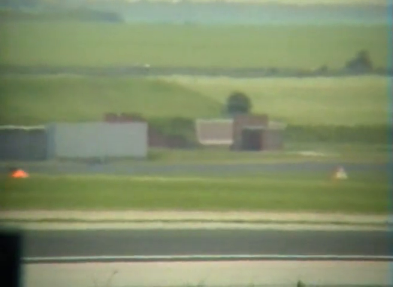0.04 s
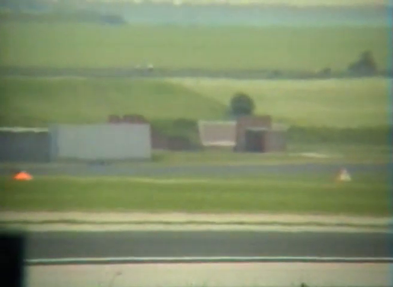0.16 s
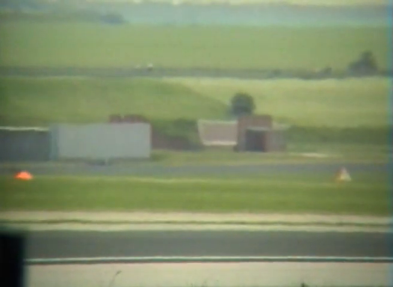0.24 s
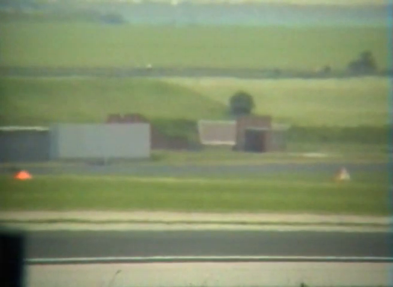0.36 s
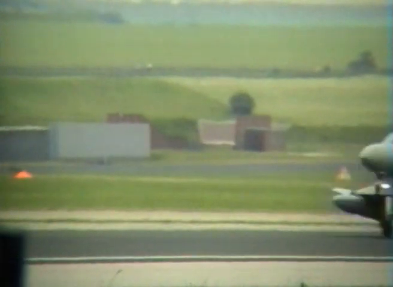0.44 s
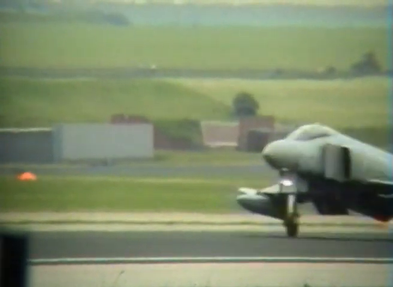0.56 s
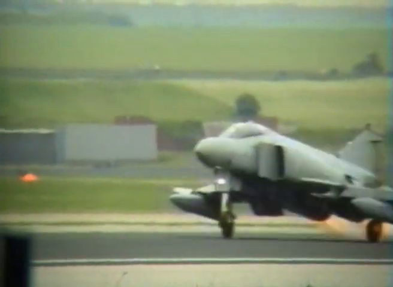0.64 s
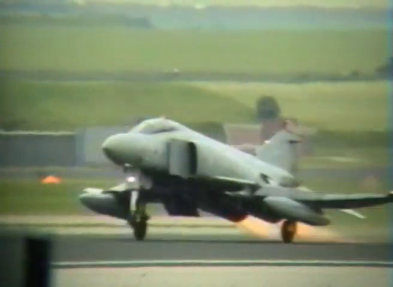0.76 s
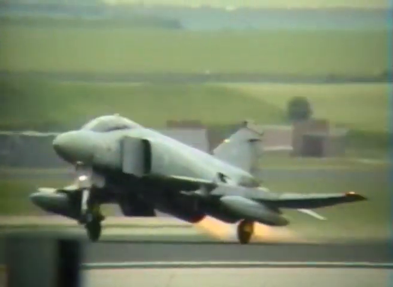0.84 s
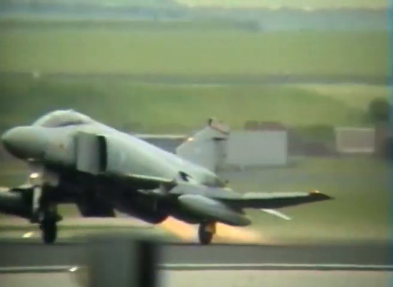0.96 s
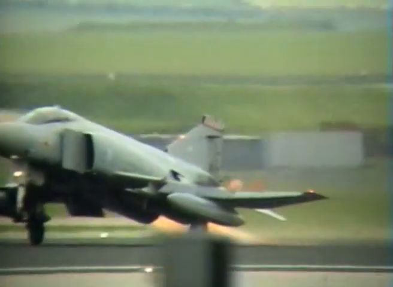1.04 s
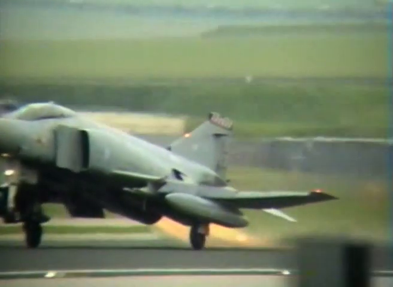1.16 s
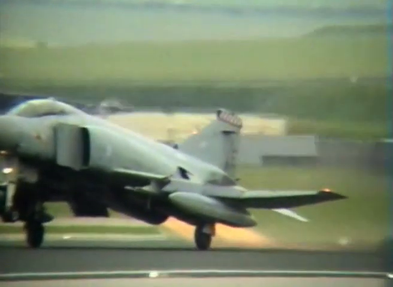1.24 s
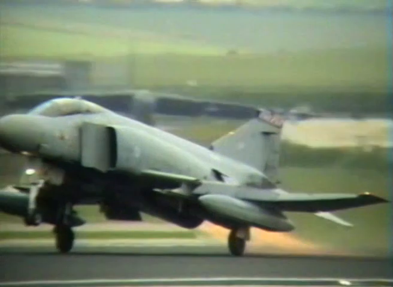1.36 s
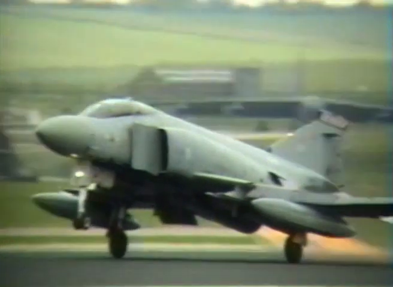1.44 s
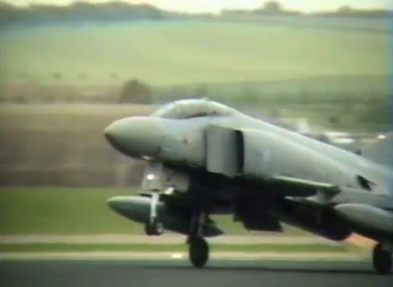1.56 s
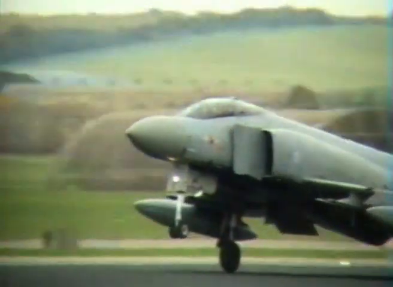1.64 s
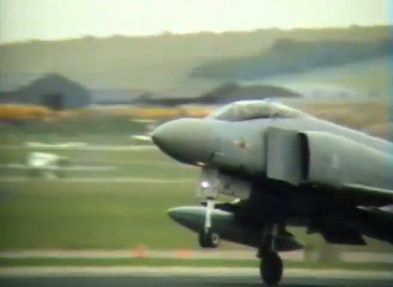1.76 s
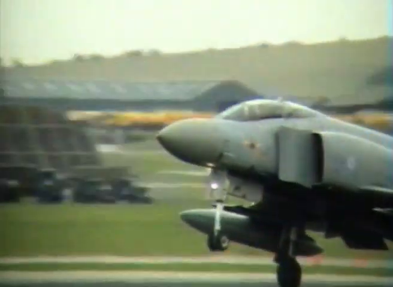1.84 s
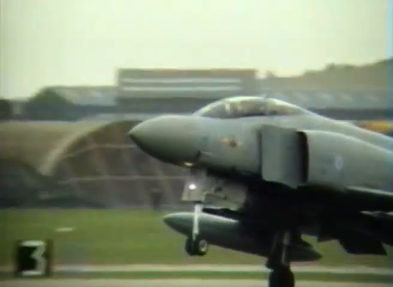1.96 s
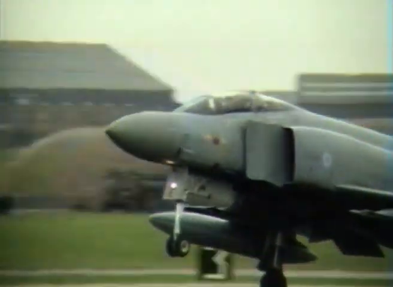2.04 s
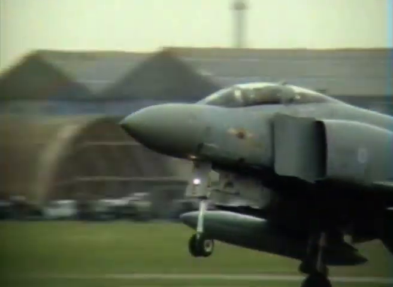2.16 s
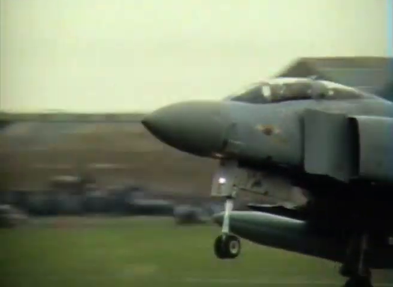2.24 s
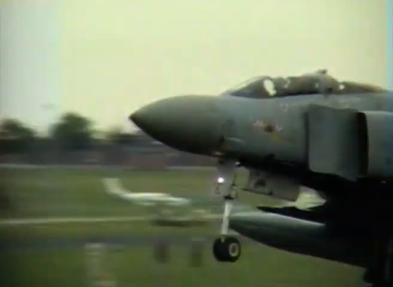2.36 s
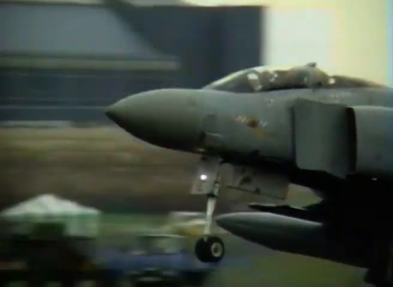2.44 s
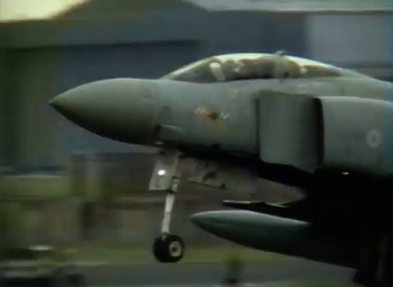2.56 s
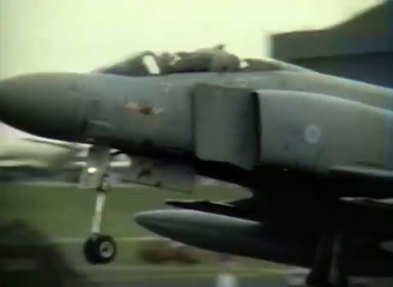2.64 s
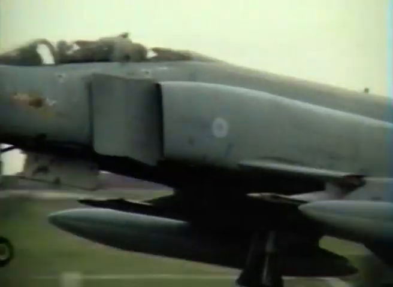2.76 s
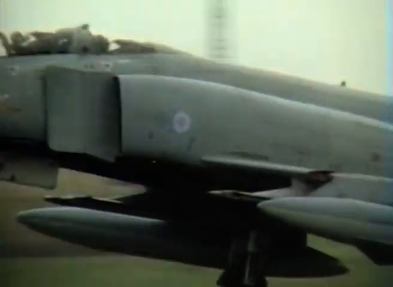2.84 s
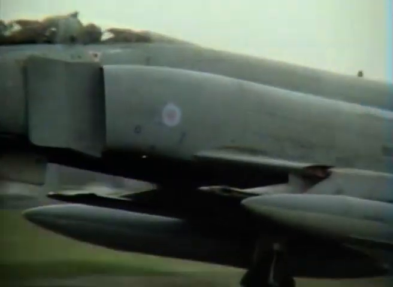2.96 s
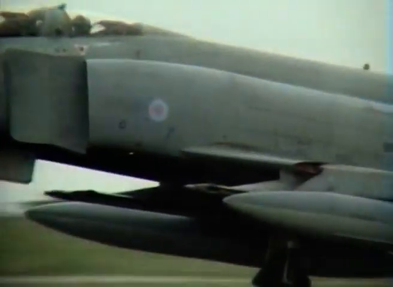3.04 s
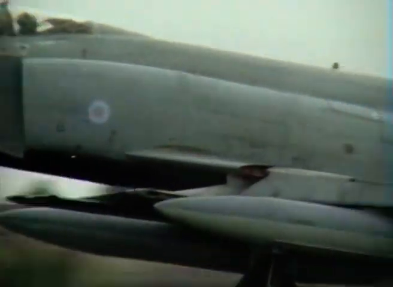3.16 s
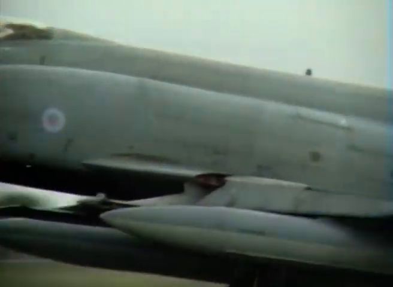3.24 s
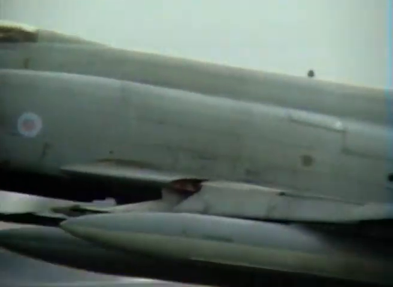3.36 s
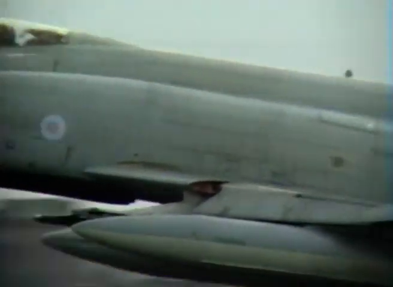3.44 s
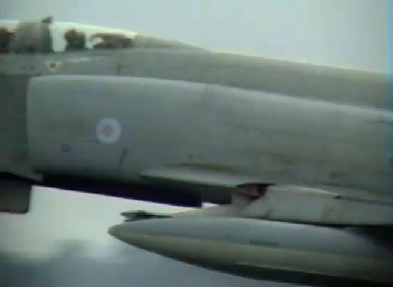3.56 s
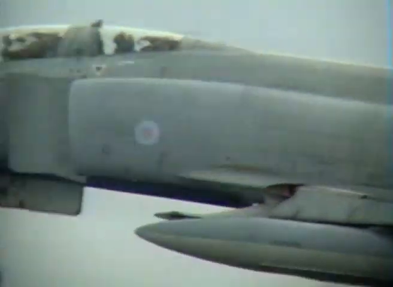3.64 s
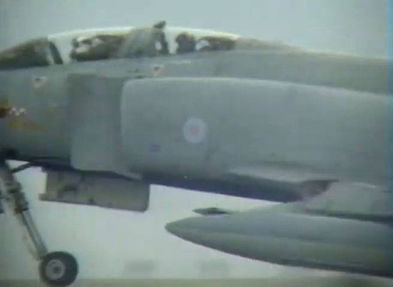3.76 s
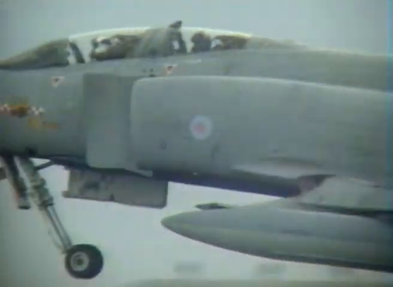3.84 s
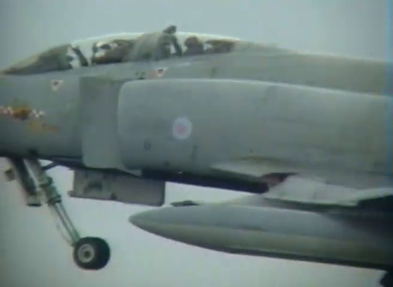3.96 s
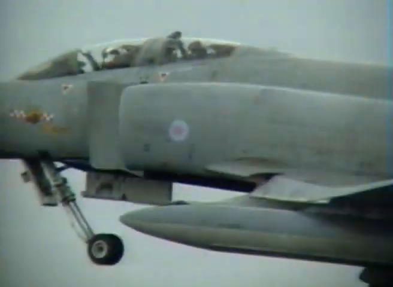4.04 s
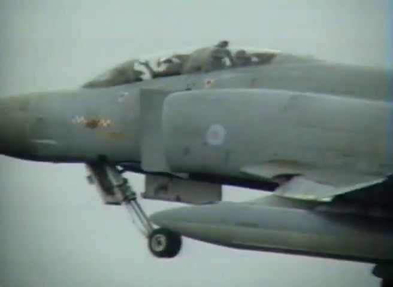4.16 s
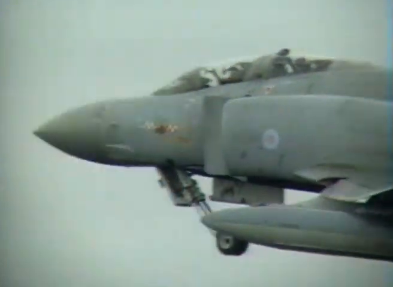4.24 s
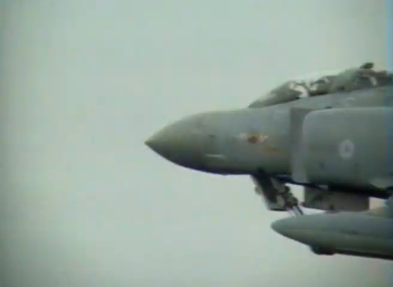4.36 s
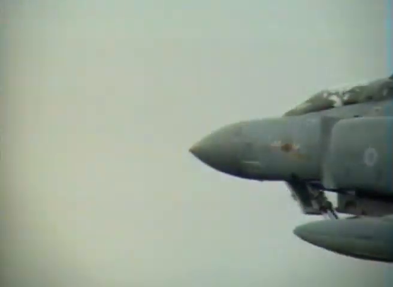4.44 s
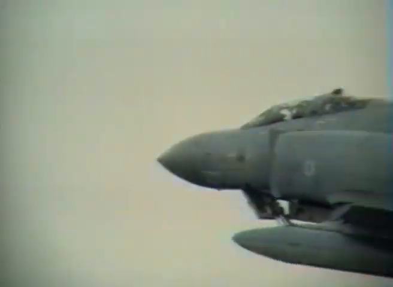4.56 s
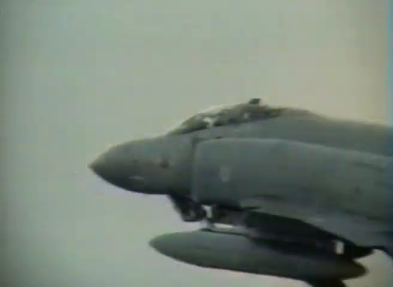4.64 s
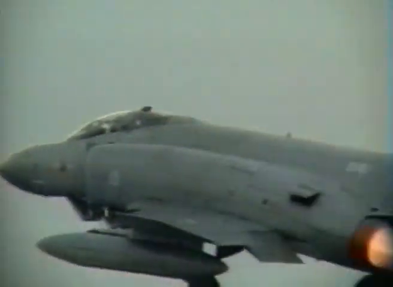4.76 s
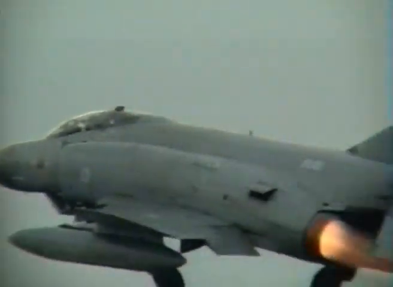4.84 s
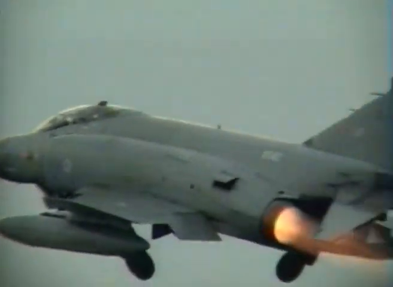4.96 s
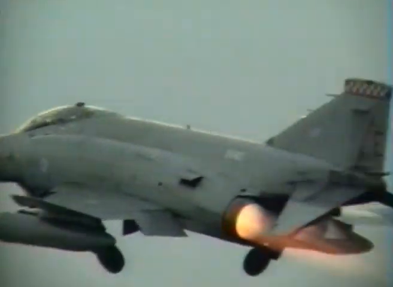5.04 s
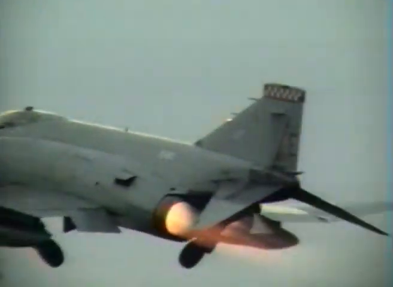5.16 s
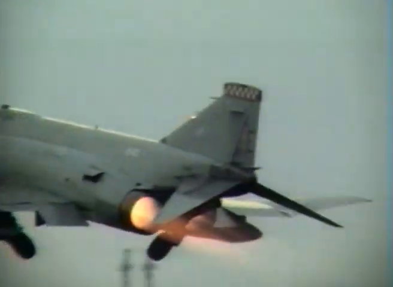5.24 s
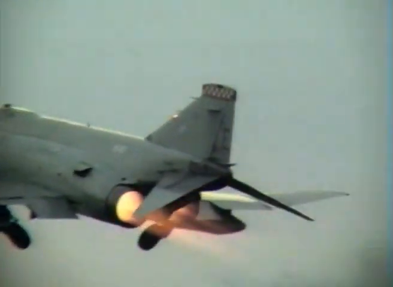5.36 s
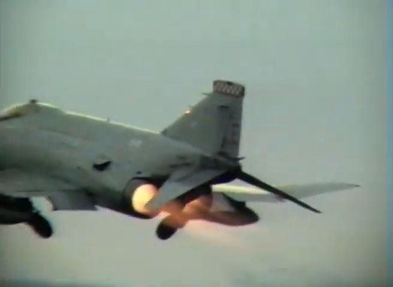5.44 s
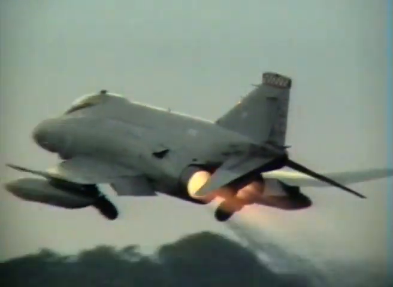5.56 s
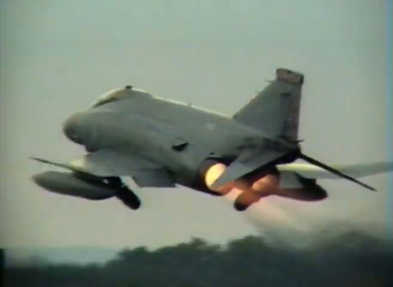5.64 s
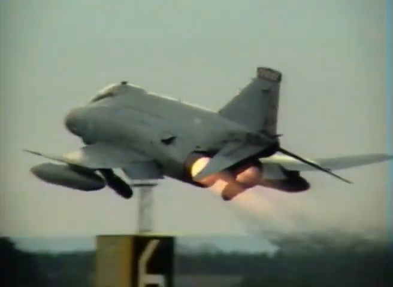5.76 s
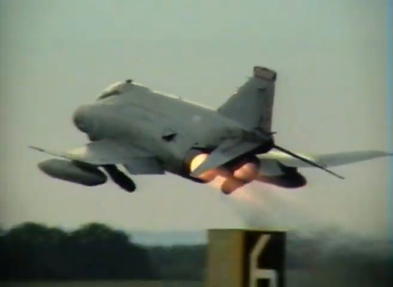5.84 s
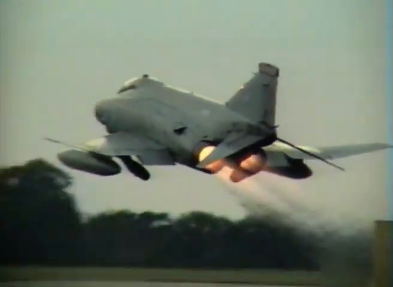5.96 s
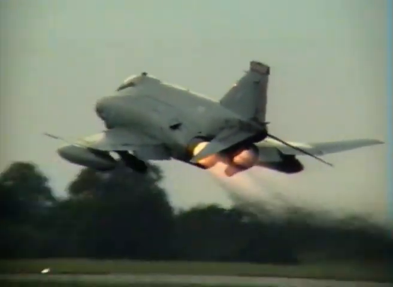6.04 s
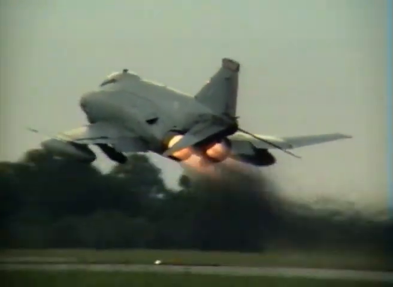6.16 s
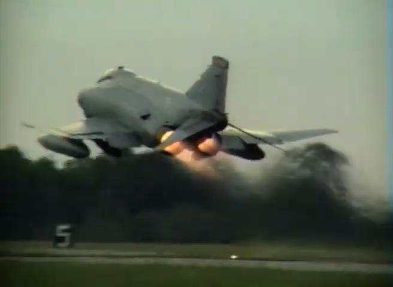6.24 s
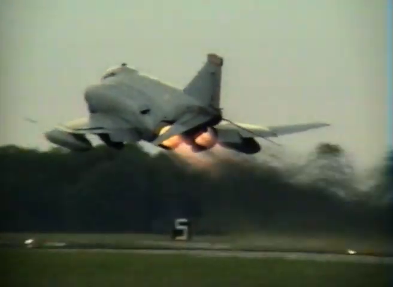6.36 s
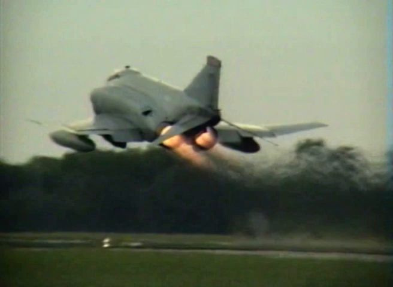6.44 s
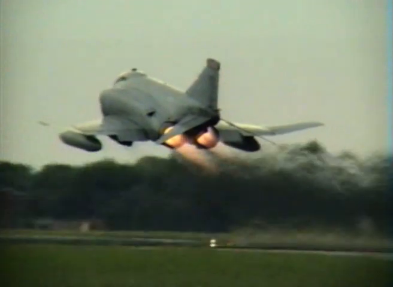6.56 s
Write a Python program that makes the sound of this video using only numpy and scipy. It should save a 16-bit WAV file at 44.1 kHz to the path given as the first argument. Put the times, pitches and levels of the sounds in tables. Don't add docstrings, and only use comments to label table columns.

```python
import sys
import numpy as np
from scipy import signal
from scipy.fft import rfft, irfft
from scipy.io import wavfile
from scipy.ndimage import uniform_filter1d, map_coordinates

SR = 44100
rng = np.random.default_rng(int(sys.argv[2]) if len(sys.argv) > 2 else 0)


def int16_out(signal):
    q = np.round(np.clip(np.atleast_2d(signal).T, -1, 1) * 32767)
    wavfile.write(sys.argv[1], SR, q.astype(np.int16))


def field_ratio(decibels):
    return 10 ** (np.asarray(decibels, dtype=float) / 20)


N = 291060

# t/s, level/dB, lean/dB
PASS = [(0.0, -60.5, 10.5), (0.79, -52, -1), (2.06, -43.5, 5), (2.79, -23.5, -7), (2.96, -25, -6.5),
        (3.2, -25.5, -3.5), (3.53, -22, -5.5), (3.77, -24, -9.5), (3.93, -24, -4.5), (4.1, -21.5, -4.5),
        (4.36, -25.5, -3), (4.45, -22.5, -7.5), (4.72, -24, -3.5), (4.98, -28.5, -1), (5.22, -24, -4),
        (5.99, -30, 0), (6.36, -42.5, 6.5), (6.6, -46, 7.5)]
PART_LEVEL_DB = [2, -9, -1, -32]
PART_LEAN_SHARE = [1.035, 0.54, 0.13, -0.04]
PART_GUST_SHARE = [.3, .7, 1.01, 1.5]
# t/s, share in roar/0-1, share in sizzle/0-1
CRACKLE = [(0, 0, .05), (1.2, 0.02, 0), (1.8, 0.24, 0.5), (2.1, 0.46, 0.78), (2.4, 0.27, 0.27),
           (2.7, 0.1, 0.24), (3.0, 0.08, 0.23), (3.25, 0.52, 0.21), (3.55, 0.02, 0.54), (3.9, 0.33, 0.5),
           (4.2, 0.58, 0.61), (4.5, 0.65, 0.88), (4.75, 0.73, 0.74), (5.0, 0.69, 0.67), (5.5, 0.6, 0.46),
           (5.8, 0.56, 0.17), (6.1, 0.57, 0.45), (6.6, 0.44, 1)]
# f/Hz, density/dB
JET_SPECTRUM = [(18, -62), (30, -39), (54, -30.5), (98, -5.5), (138, 1), (289, -6.5), (473, -12.5),
                (605, -20.5), (1100, -16.5), (1470, -15), (2720, -15), (3150, -17.5), (4000, -22.5),
                (5550, -31), (9320, -40.5), (10800, -47.5), (14000, -63), (22000, -120)]
# t/s, sigma/s, level/dB
GUSTS = [(.3, 0.087, -0.5), (1.28, .06, 1.5), (1.7, 0.083, 1.5), (3.42, .03, 1), (6.164, 0.027, -1.5),
         (4.252, .03, 1), (4.58, 0.032, -0.5), (0.71, 0.18, 1.5), (1.09, 0.11, 0.5), (1.483, 0.057, 0),
         (2.035, 0.03, -1), (2.322, 0.027, 3), (2.576, 0.035, -2.5), (2.755, 0.014, 2.5),
         (2.91, 0.017, -1.5), (3.18, 0.04, 5), (3.299, 0.057, 6), (3.525, .04, -1), (3.65, 0.061, -2),
         (3.754, 0.045, 5), (3.866, 0.13, -1.5), (4.022, 0.027, 4.5), (4.12, 0.036, 2), (4.367, 0.03, -2),
         (4.49, 0.02, 2), (4.684, 0.029, 2.5), (4.81, 0.018, -1.5), (4.86, .03, 0.5), (5.08, 0.025, 0),
         (5.272, .03, 0), (5.52, 0.017, -3.5), (5.827, .03, 0.5), (5.957, 0.027, 0.5), (1.9, 0.15, 0),
         (2.148, 0.035, 1), (5, 0.04, -1.5), (5.208, 0.037, 1), (5.467, 0.035, 2), (5.6, 0.041, -4.5),
         (5.696, 0.14, 2.5), (6.08, 0.053, 0.5), (6.315, 0.033, -2.5), (6.47, 0.086, 0.5)]
# t/s, sigma/s, level/dB
BILLOWS = [(1.2, 0.11, -3), (1.5, 0.17, 1), (1.9, .1, -0.5), (2.45, 0.068, 0.5), (2.96, 0.11, 3.5),
           (3.2, .07, 2.5), (3.456, 0.049, -2.5), (3.9, 0.059, -4), (4.052, 0.046, -0.5), (4.17, 0.092, -3),
           (4.27, .04, 0), (0.75, .1, 0.5), (.3, .1, 0), (2.15, .08, -2), (6.037, 0.046, -1), (6.45, .1, 2),
           (3.68, .06, 0.5), (2.9, .04, 0.5), (4.433, 0.036, 0.5), (2.7, 0.088, -2), (4.345, 0.061, 3.5),
           (4.6, 0.069, 0.5), (4.846, 0.094, -1.5), (5.1, 0.078, 1), (5.34, 0.041, 3), (5.6, 0.071, -1),
           (5.844, 0.035, 2), (6.2, 0.11, 0)]
# t/s, sigma/s, level/dB
GROUND_ECHO = [(.1, .12, 2.5), (0.398, 0.15, 4.5), (1.1, 0.32, 5.5), (0.752, 0.13, 0.5), (1.3, .08, 0.5),
               (2.05, 0.089, 1), (6.104, 0.12, 3), (2.504, 0.028, 2.5), (1.5, 0.13, -2),
               (1.753, 0.27, -0.5), (2.605, 0.12, 2.5), (3.15, 0.036, 1), (3.562, 0.06, 0),
               (3.877, 0.068, 1), (4.138, 0.027, 2), (4.6, .1, 2.5), (4.9, 0.19, -1.5), (5.203, .1, 0.5),
               (5.904, 0.22, 2), (2.338, 0.14, 5.5), (2.913, 0.082, 0), (3.365, 0.032, 0.5),
               (3.46, 0.051, 1), (3.97, .04, -2.5), (3.697, 0.036, -4.5), (4.05, 0.05, -1),
               (4.336, 0.095, -5.5), (5.55, 0.25, 2.5), (6.41, 0.14, -3)]
# t/s, sigma/s, lag change/ms, strength change
PANNING = [(.15, 0.32, 0.022, -0.23), (2.2, 0.39, 0.0034, -0.051), (1.1, .4, 0.0084, -0.024),
           (2.95, 0.065, 0.0073, -0.02), (3.196, 0.13, 0.043, -0.21), (3.36, 0.036, -0.042, 0.048),
           (3.45, 0.05, -0.034, -0.02), (3.57, 0.034, -0.02, -0.031), (3.872, 0.07, 0.013, 0.16),
           (4.005, 0.05, -0.025, 0.18), (4.123, 0.027, 0.026, 0), (4.25, 0.058, 0.024, 0.14),
           (4.37, .05, 0.0061, 0.077), (4.6, 0.08, 0.0043, 0.077), (4.82, 0.098, 0.014, 0.021),
           (5.1, 0.16, 0.019, -0.064), (5.7, 0.13, 0.0071, 0.018), (6.3, 0.36, -0.019, 0.088)]
# t/s, f/Hz
HOWL_PITCH = [
    (0, 146),
    (2.7, 145),
    (3.0, 141),
    (3.3, 133),
    (3.5, 128),
    (3.7, 119),
    (4.0, 110),
    (4.3, 104),
    (4.8, 99),
]
# t/s, sigma/s, peak level/dB
SURGES = [(1.01, 0.12, -50.5), (1.236, 0.051, -46), (1.673, 0.087, -38), (1.82, 0.063, -45),
          (1.91, 0.02, -35), (2.042, 0.0068, -29), (2.185, 0.084, -31.5), (2.353, 0.022, -25),
          (2.51, 0.033, -29), (2.678, 0.037, -17), (2.8, 0.035, -20), (2.93, 0.093, -28),
          (3.167, 0.042, -39), (3.273, 0.055, -34), (3.422, 0.055, -47), (3.562, 0.042, -29.5),
          (3.696, 0.053, -24.5), (3.904, 0.051, -26.5), (3.798, 0.037, -42), (4.02, 0.056, -34),
          (4.146, 0.053, -28), (4.247, 0.055, -39), (4.373, 0.027, -47), (4.55, 0.048, -30.5)]
# t/s, edge peak/dB, body peak/dB
SHOCKS = [(4.1075, -26, -6), (4.1144, -29, -9), (4.123, -23, -11), (4.1326, -25, -4),
          (4.182, -24, -15), (4.2075, -30, -11), (4.225, -33, -5), (4.2464, -37, -1),
          (4.253, -26.1, -10), (4.275, -25, -16), (4.2926, -30, -10), (4.3017, -27, -6),
          (4.3196, -23, -1), (4.3413, -27, -14), (4.354, -25, -7), (4.3876, -25, -11),
          (4.4126, -24, -6), (4.4307, -20, -0.5), (4.4555, -27, -9), (4.475, -24, 2),
          (4.4942, -21, -1), (4.5049, -8.5, -14), (4.512, -23.9, -7), (4.524, -17, 1),
          (4.536, -24.1, -2), (4.5431, -22, -2), (4.5494, -21.3, -10.4), (4.5613, -13.5, -2),
          (4.5775, -26, -4), (4.6015, -21, 0), (4.6151, -25, -0.5), (4.6465, -28, 3), (4.6537, -24, 2),
          (4.6666, -21.5, -10), (4.679, -19.8, -5), (4.6873, -23, 0), (4.6998, -20, -4),
          (4.7067, -20, -14), (4.7212, -23.7, -19), (4.728, -25, -1), (4.735, -22, -9),
          (4.748, -15.5, -3), (4.76, -24.2, -6), (4.7726, -24.4, -18), (4.7835, -26, -7),
          (4.851, -27, 0), (4.859, -30, -4), (4.867, -35, -5), (4.8736, -36, -7), (4.8826, -37, 0),
          (5.0078, -27, -16), (5.053, -29.2, -8), (5.0593, -23, -5), (5.0763, -27, -5),
                (5.083, -27.1, -8), (5.0871, -26.8, -1), (5.1195, -23, -18), (5.164, -28.2, -3),
                (5.191, -32, 1.5), (5.2436, -29, -11), (5.2629, -18, 3.5), (5.2698, -26, -13),
                (5.276, -27.0, -6), (5.303, -27.0, -5), (5.3548, -25, -3), (5.41, -30.0, -4),
                (5.455, -31, -5), (5.4608, -28.1, -9.6), (5.483, -37, -3), (5.5324, -31, -12),
                (5.5457, -32.2, -11), (5.5606, -33.4, -12.7), (5.5685, -35.6, -10.2), (5.6046, -35.0, -15),
                (5.614, -38, -15), (5.6748, -29.6, -4), (5.6891, -29.3, 5), (5.704, -33.9, -6),
                (5.7096, -30, 1), (5.74, -27.2, 2.5), (5.763, -33, 0), (5.779, -37, 0), (5.822, -31, -6),
                (5.8324, -30, -6), (5.8728, -26, -6), (5.9134, -38, -5), (5.929, -38, -11),
                (5.949, -25, -3), (5.9645, -38, -4), (5.973, -36, -8), (5.9878, -38, -3), (6.0055, -37, -5),
                (6.014, -37, -2), (6.1641, -38, -26), (6.2155, -44, -13), (6.288, -35, -13),
                (6.296, -41, -18), (6.382, -42.4, -18), (6.477, -47, -19), (6.571, -43, -27.1)]
# t/s, peak/dB
SPIKES = [(4.4975, -44), (4.5047, -35), (4.5494, -43), (4.5615, -40), (4.6015, -46), (4.6537, -46),
          (4.6666, -45), (4.679, -40), (4.6998, -43), (4.748, -32), (4.761, -42)]
# f/Hz, density/dB
HISS_SPECTRUM = [(1760, -40), (3000, -19), (4640, -7), (5550, -3.5), (6140, -3.5), (6920, -2.5),
                 (8740, -2.5), (12500, -1), (16200, -33), (22000, -120)]
# f/Hz, density/dB
MOTOR_SPECTRUM = [(12, -49), (20, -21), (32, -12), (59, -3), (65, -1), (90, -1), (120, -9), (200, -120)]

RUMBLE_TOP_HZ, GROWL_TOP_HZ, ROAR_TOP_HZ = 461, 1180, 4290
TIME_S = np.arange(N) / SR


def curve(table):
    s, *columns = np.transpose(table)
    return [np.interp(TIME_S, s, column) for column in columns]


def bumps(s, sigma_s, size):
    t = np.arange(0, N, 32) / SR
    swells = sum(g * np.exp(-0.5 * ((t - a) / w) ** 2) for a, w, g in zip(s, sigma_s, size))
    return np.interp(TIME_S, t, swells)


def unit(x):
    return x / np.sqrt(np.mean(x ** 2))


def walk(rate_hz):
    hold = int(SR / rate_hz)
    steps = np.repeat(rng.standard_normal(N // hold + 1), hold)
    return unit(uniform_filter1d(uniform_filter1d(steps, hold), hold)[:N])


def coloured(x, spectrum):
    hz, db = np.transpose(spectrum)
    size = 8192
    log_hz = np.log(np.fft.rfftfreq(size, 1 / SR) + 1)
    cepstrum = irfft(np.log(field_ratio(np.interp(log_hz, np.log(hz), db))))
    cepstrum[1:size // 2] *= 2
    cepstrum[size // 2 + 1:] = 0
    return signal.fftconvolve(x, irfft(np.exp(rfft(cepstrum))))[:N]


def under(x, hz):
    return signal.sosfiltfilt(signal.butter(3, hz, fs=SR, output="sos"), x)


def cut(x, hz, kind):
    return signal.lfilter(*signal.butter(1, hz, kind, fs=SR), x)


def capped(x):
    return signal.sosfilt(signal.ellip(10, 0.2, 70, 13620, fs=SR, output="sos"), x)


def two_pickups(x, treble_share):
    s, sigma_s, lag_change_ms, strength_change = np.transpose(PANNING)
    abeam_s, abeam_lag_ms = 3.717, 0.026
    along_s = TIME_S - abeam_s
    going = along_s > 0
    swing_s = np.where(going, 1.193, 0.95)
    end_on_lag_ms = np.where(going, 0.774, 0.62)
    end_on = np.abs(along_s) / np.hypot(along_s, swing_s)
    lag_ms = np.hypot(end_on_lag_ms * end_on + bumps(s, sigma_s, lag_change_ms), abeam_lag_ms)
    lag_samples = SR / 1000 * lag_ms * (1 + 0.02 * walk(12))
    copy = x * treble_share + under(x, 4100) * (1 - treble_share)
    late = map_coordinates(copy, [np.arange(N) - lag_samples], order=3)
    strength = np.where(going, 0.49, 0.48) + 0.12 * (1 - end_on)
    strength = np.clip(strength + bumps(s, sigma_s, strength_change), 0, 1)
    return (x + strength * late) / np.sqrt(1 + strength ** 2)


def turbulence(crackle, noise, fronts):
    crackle = np.clip(crackle, 0, 1)
    return np.sqrt(1 - crackle) * noise + np.sqrt(crackle) * fronts


def jet():
    level_db, lean_db = curve(PASS)
    gust_db = bumps(*np.transpose(GUSTS))
    rumble_db, growl_db, roar_db, sizzle_db = (
        level_db + db + lean * lean_db + gust * gust_db
        for db, lean, gust in zip(PART_LEVEL_DB, PART_LEAN_SHARE, PART_GUST_SHARE))
    roar_crackle, sizzle_crackle = curve(CRACKLE)

    front_db = 2.27 * np.minimum(rng.exponential(size=N), 3.5)
    fronts = (rng.random(N) < 700 / SR) * field_ratio(front_db)
    fronts = unit(fronts - fronts.mean())
    noise = coloured(two_pickups(rng.standard_normal(N), 0.12), JET_SPECTRUM)
    fronts = coloured(two_pickups(fronts, 0.12), JET_SPECTRUM)

    eddies = walk(24.83)
    deep = turbulence(0.13 * roar_crackle, noise, fronts)
    rumble_db = rumble_db + bumps(*np.transpose(BILLOWS)) + 0.81 * walk(11)
    rumble = field_ratio(rumble_db) * unit(under(deep, RUMBLE_TOP_HZ))

    softer = turbulence(0.35 * roar_crackle, noise, fronts)
    growl_db = growl_db + bumps(*np.transpose(GROUND_ECHO)) + eddies + 1.1 * walk(13)
    growl = field_ratio(growl_db) * unit(under(softer, GROWL_TOP_HZ) - under(softer, RUMBLE_TOP_HZ))

    blast = turbulence(roar_crackle, noise, fronts)
    roar_band = under(blast, ROAR_TOP_HZ) - under(blast, GROWL_TOP_HZ)
    roar = field_ratio(roar_db + 0.5 * eddies) * unit(roar_band)

    bright = turbulence(sizzle_crackle, noise, fronts)
    dull = under(bright, 12000)
    bright = dull + field_ratio(-6 + 4.5 * sizzle_crackle) * (bright - dull)
    sizzle_db = sizzle_db + 15.5 * sizzle_crackle + 0.5 * eddies
    sizzle = field_ratio(sizzle_db) * unit(bright - under(bright, ROAR_TOP_HZ))
    return rumble + growl + roar + sizzle


def howl():
    s, sigma_s, peak_db = np.transpose(SURGES)
    rest_db = -71
    size = field_ratio(rest_db) + bumps(s, sigma_s, field_ratio(peak_db))
    hz, = curve(HOWL_PITCH)
    phase = 2 * np.pi * np.cumsum(hz * (1 + 0.0055 * walk(17))) / SR
    return np.sqrt(2) * size * field_ratio(0.2 * walk(24.8)) * np.sin(phase)


def click(spectrum):
    size = 512
    impulse = np.arange(size) == 0
    shape = irfft(np.abs(rfft(coloured(impulse, spectrum)[:2 * size])))
    return np.roll(shape, size) / shape.max()


def pulses(s, peak_db, spectrum):
    train = np.zeros(N)
    train[(s * SR).astype(int)] = field_ratio(peak_db)
    return signal.fftconvolve(train, click(spectrum), "same")


def shocks():
    s, edge_db, body_db = np.array(SHOCKS).T
    edge = pulses(s, edge_db - 2, [(2500, -17), (5000, 8), (7000, 5), (9500, 1), (10800, -3),
                                   (13500, -36), (15000, -70)])
    body = pulses(s, body_db - 8.5, [(300, -30), (800, -3), (1400, 4), (2500, 4), (4000, -3),
                                     (6000, -29.5), (12000, -38)])
    far_from_s, far_over_s, dull_hz = 4.8, 0.3, 10200
    far = np.clip((TIME_S - far_from_s) / far_over_s, 0, 1)
    edge = (1 - far) * edge + far * under(under(edge, dull_hz), dull_hz)
    spike_s, spike_db = np.transpose(SPIKES)
    spike = pulses(spike_s, spike_db, [(8000, -40), (10500, -6), (12000, 4), (13500, -9),
                                       (15000, -22), (18000, -60)])
    return two_pickups(edge + spike + body, 0.84)


def scene():
    return np.tile(capped(jet()) + howl() + shocks(), (2, 1))


def tape_track(x):
    hiss = field_ratio(-63.5) * unit(coloured(rng.standard_normal(N), HISS_SPECTRUM[:-1]))
    motor = field_ratio(-59.5) * unit(coloured(rng.standard_normal(N), MOTOR_SPECTRUM))
    capsule_hz, capsule_width_hz, capsule_db = 9250, 900, -5
    ring = signal.lfilter(*signal.iirpeak(capsule_hz, capsule_hz / capsule_width_hz, fs=SR), x)
    return 2 * (x + field_ratio(capsule_db) * ring + capped(hiss) + motor)


def stereo_spread(tape):
    crossover_hz, right_db, right_top_hz, right_late_s = 850, -1.1, 10900, 7e-6
    left = cut(tape, crossover_hz, "high")
    right = field_ratio(right_db) * cut(tape, crossover_hz, "low")
    right = right - 0.1 * (right - under(right, 1100))
    right = map_coordinates(right, [np.arange(N) - right_late_s * SR], mode="nearest")
    right = -under(under(right, right_top_hz), right_top_hz)
    spread = np.array([left, right])
    ceiling = 0.9
    left, right = spread / (1 + (spread / ceiling) ** 4) ** (1 / 4)
    right_end = signal.ellip(8, 0.1, 50, right_top_hz, fs=SR, output="sos")
    return np.array([left, signal.sosfiltfilt(right_end, right)])


def band_limit(x):
    return signal.sosfilt(signal.butter(12, 14800, fs=SR, output="sos"), x)


def record(dry):
    mix = stereo_spread(tape_track(dry[0]))
    return band_limit(mix)


dry = scene()
out = record(dry)
int16_out(out)
```